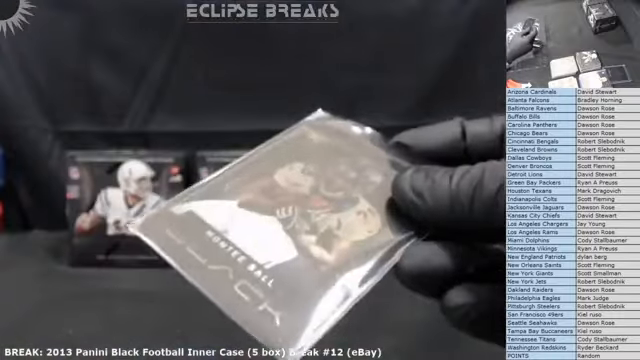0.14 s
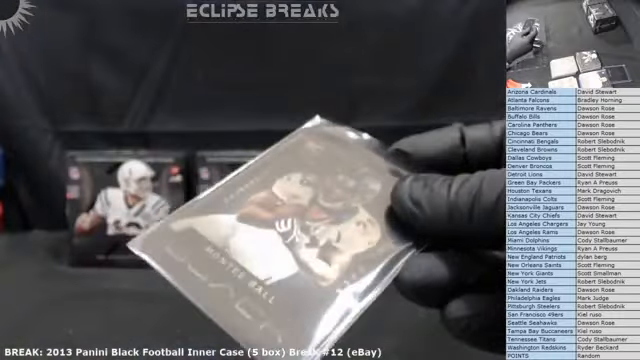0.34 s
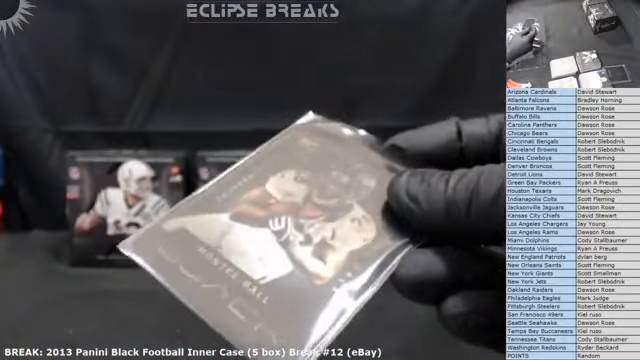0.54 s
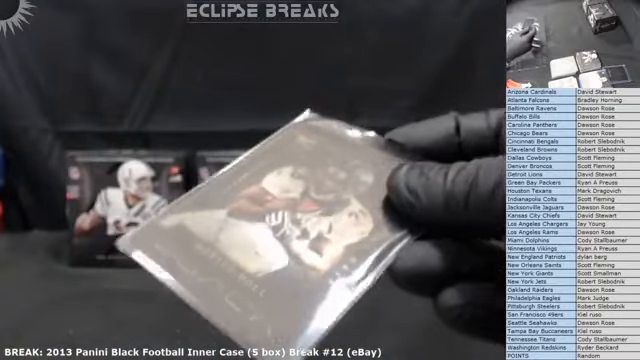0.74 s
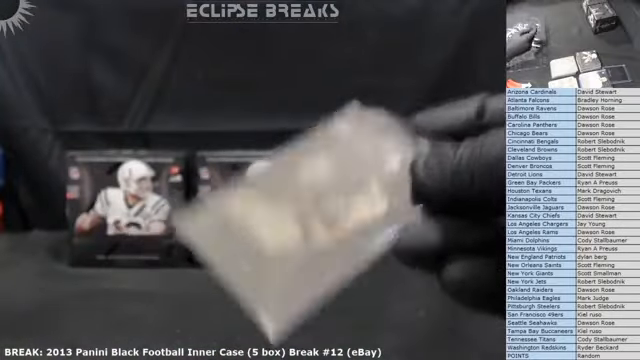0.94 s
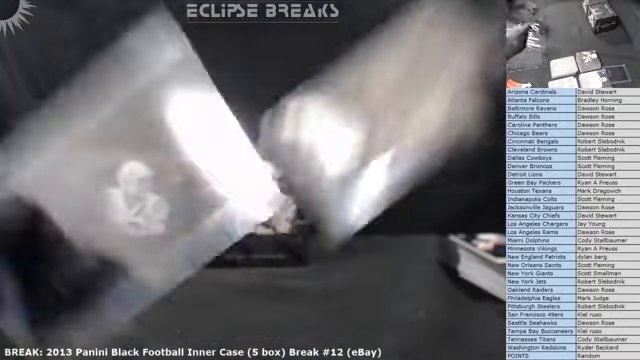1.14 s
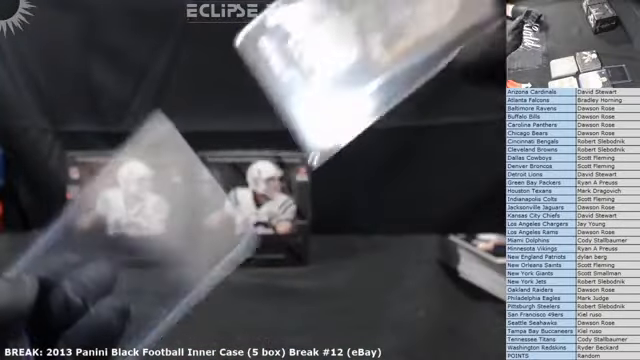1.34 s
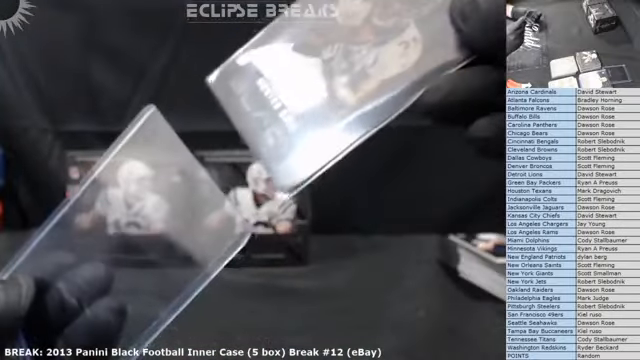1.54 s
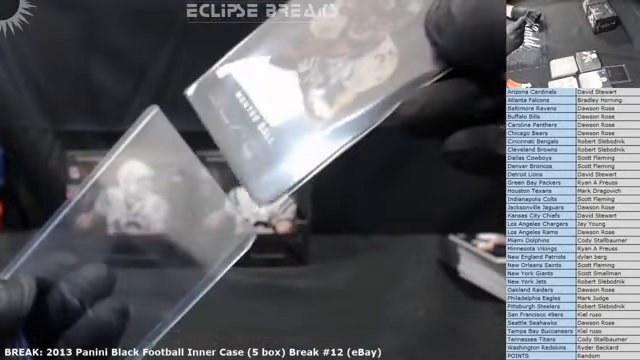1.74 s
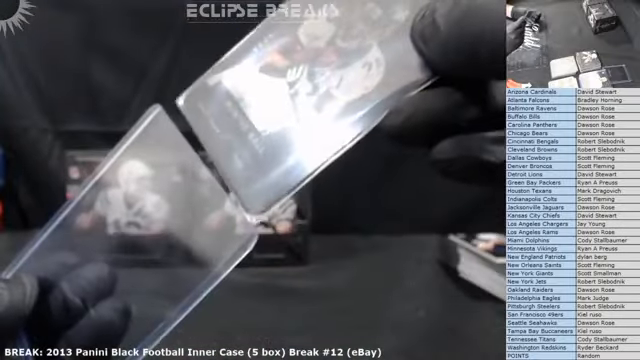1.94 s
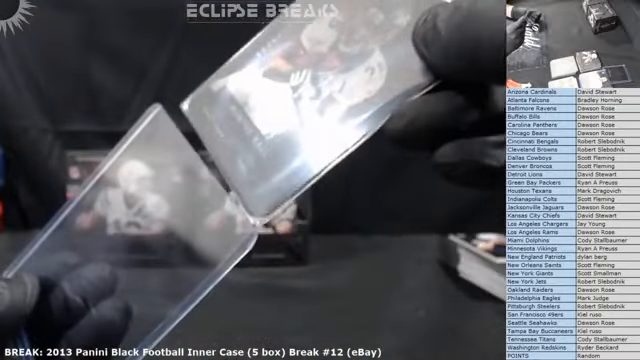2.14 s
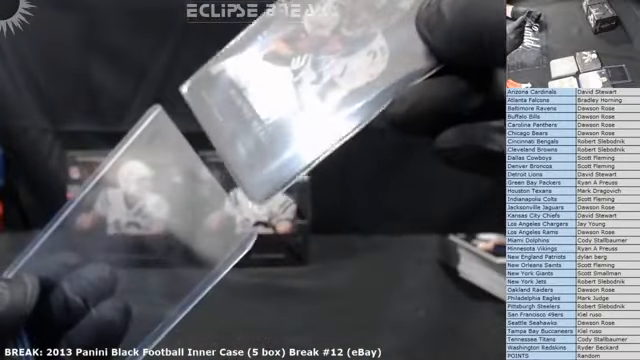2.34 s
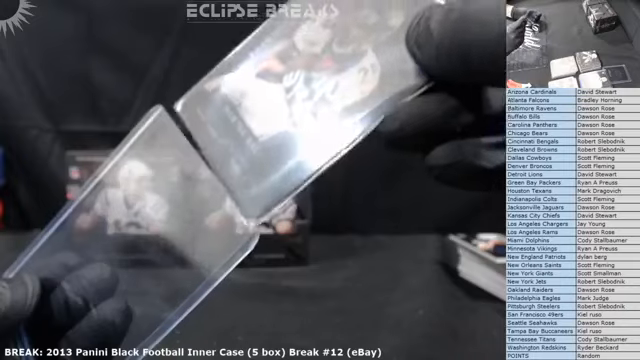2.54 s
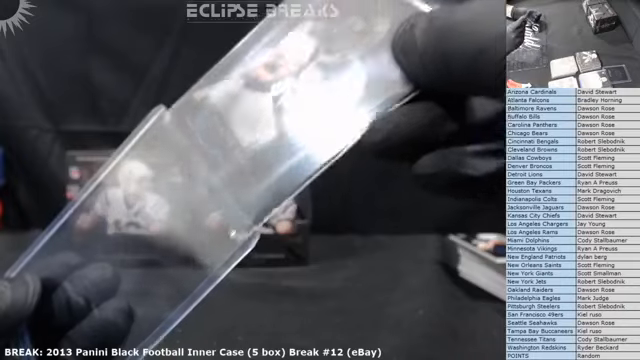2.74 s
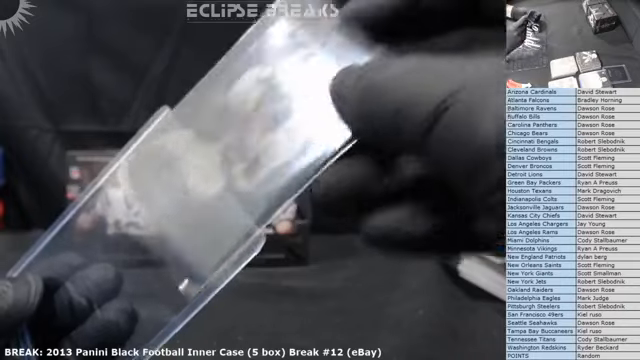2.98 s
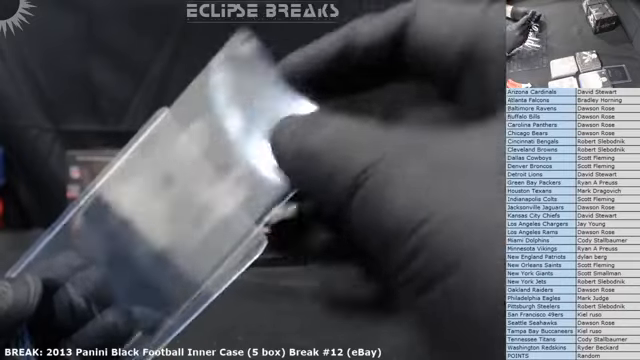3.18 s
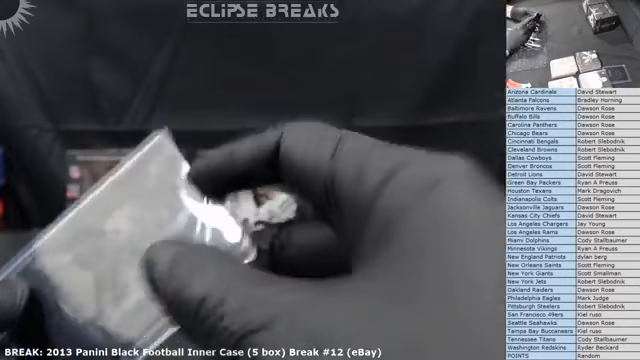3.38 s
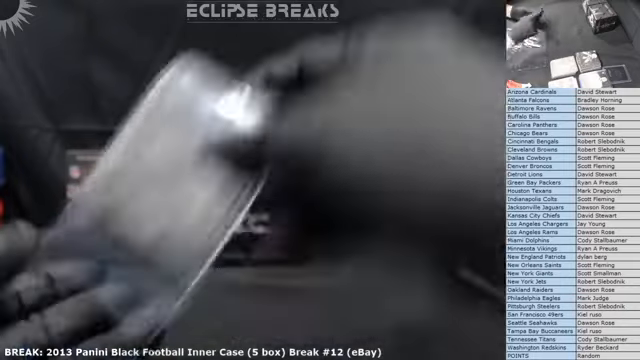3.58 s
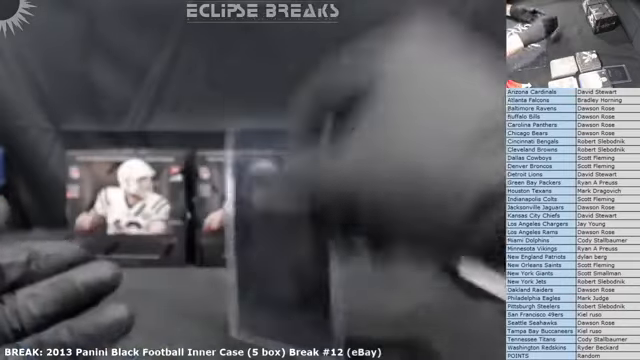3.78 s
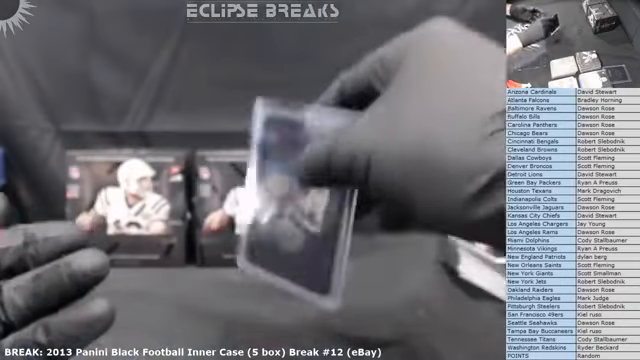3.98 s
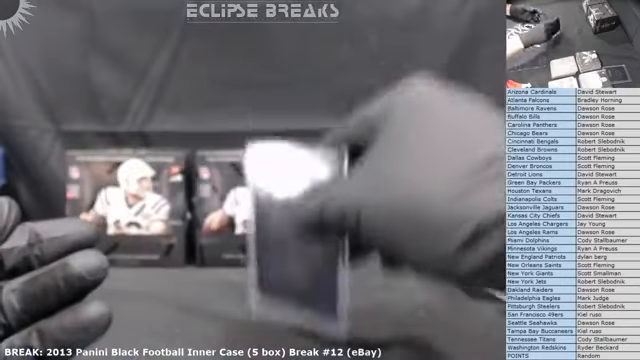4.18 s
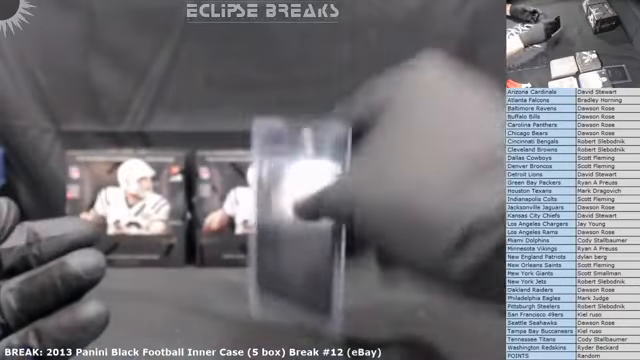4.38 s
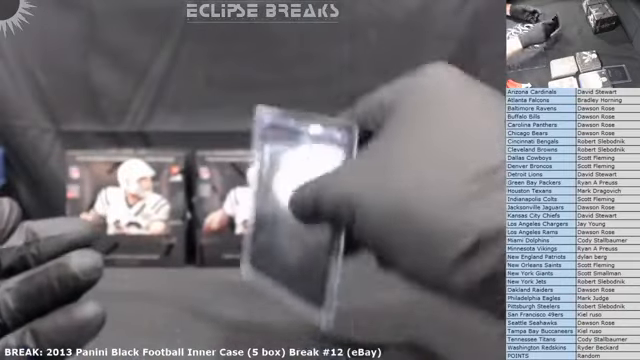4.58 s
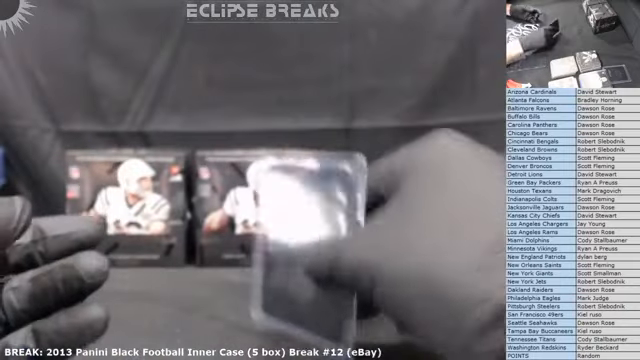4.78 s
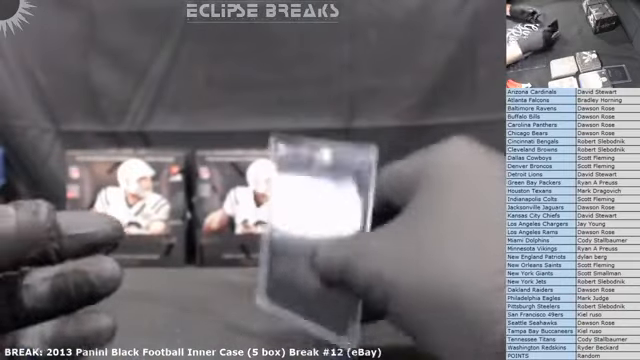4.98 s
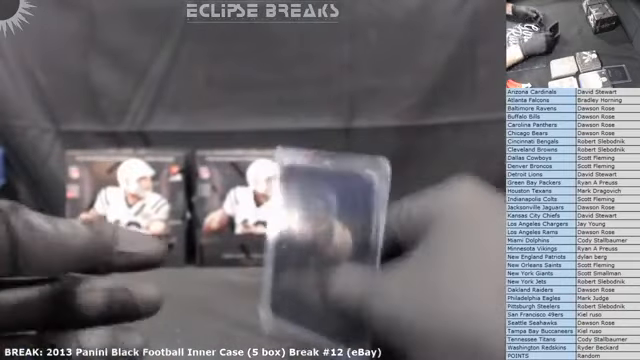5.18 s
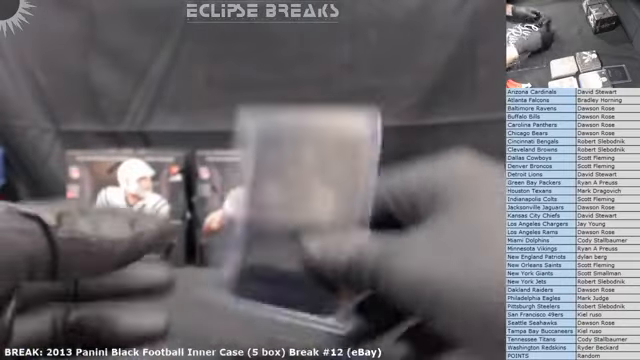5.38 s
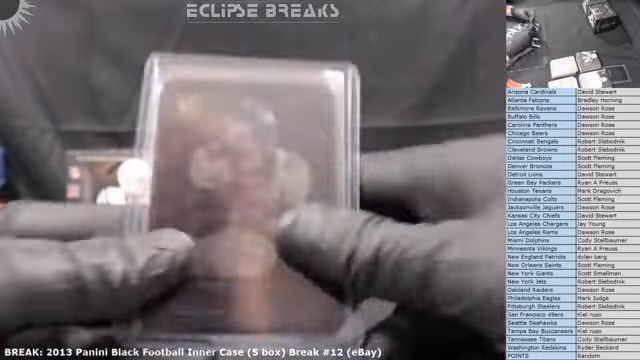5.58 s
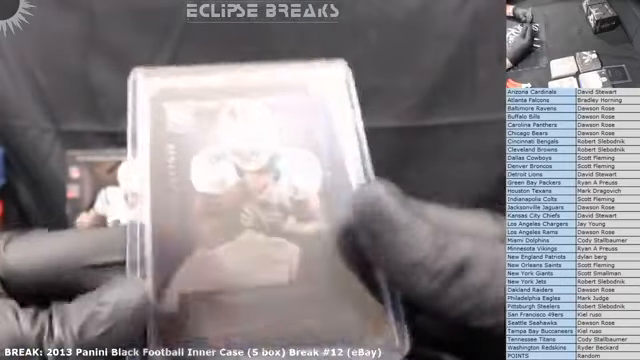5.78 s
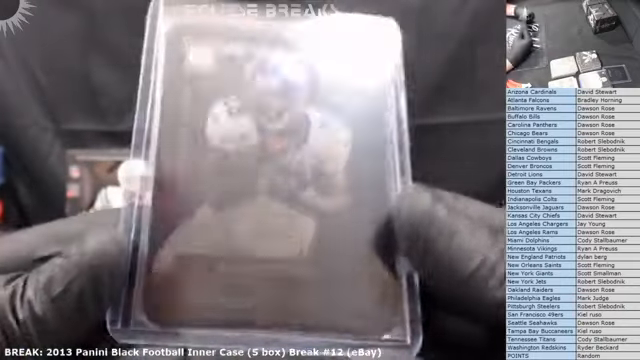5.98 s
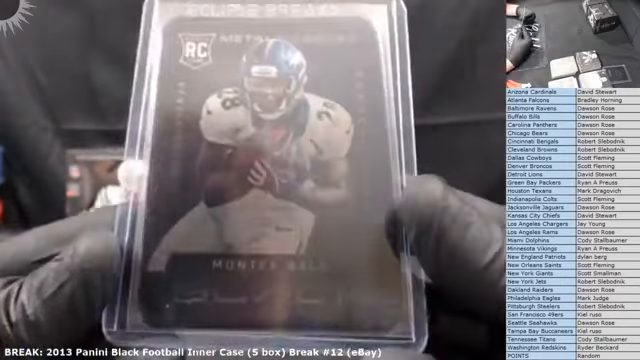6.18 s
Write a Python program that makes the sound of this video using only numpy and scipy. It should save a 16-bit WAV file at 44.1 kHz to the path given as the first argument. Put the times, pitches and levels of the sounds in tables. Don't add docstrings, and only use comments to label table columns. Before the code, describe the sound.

Close on a table in a quiet room, gloved fingers rub thin plastic with faint crinkles and small ticks while a cuff drags and knocks. After a near-silent gap, a card slides into a hollow plastic holder and snaps home. Seven heavy edge taps follow, booming through the tabletop with hard cracks, overloading the small stereo microphone. Light rubbing and clicks finish.

```python
import sys
import numpy as np
from scipy import signal
from scipy.fft import rfft, irfft, next_fast_len
from scipy.io import wavfile
from scipy.ndimage import uniform_filter1d, map_coordinates

SR = 44100
rng = np.random.default_rng(int(sys.argv[2]) if len(sys.argv) > 2 else 0)


def magnitude_from_level(level_db):
    exponent = np.asarray(level_db, float) / 20
    return 10 ** exponent


def transcribe(u):
    v = np.clip(np.atleast_2d(u).T, -1, 1)
    q = np.round(v * 32767).astype(np.int16)
    wavfile.write(sys.argv[1], SR, q)


N = 274302

# pitch_hz, level_db
WHINE = [(1001, -84), (1200, -93), (1400, -101), (1599, -92), (1798, -97.5), (3601, -106), (5599, -110),
         (5798, -110), (6998, -103), (7499, -104), (8000, -98.5), (13749, -115), (14250, -114),
         (14750, -111)]
# freq_hz, density_db_per_hz
CONVERTER_HISS = [(7000, -38.5), (8800, -14), (10000, -4.5), (14000, -4), (15000, -5), (15300, -58)]
# freq_hz, density_db_per_hz
AIR = [(11, -36), (18, -1), (49, 0.5), (71, -8.5), (118, -5.5), (269, -18.5), (367, -25), (417, -24),
       (858, -34), (1030, -34), (1470, -36), (1590, -39.5), (1960, -41.5), (7870, -50.5), (8500, -29),
       (11000, -88.5), (18700, -120)]
AIR_DB, RUMBLE_DB = -58, -67
# centre_s, width_s, rise_db
LEANS = [
    (.62, .2, 6.6),
    (3.6, 0.68, 4.2),
    (4.4, .3, 3.3),
    (4.869, 0.2, 16),
    (5.399, 0.17, 6.8),
]
# freq_hz, likeness_0_to_1
ALIKE = [(60, 0.92), (120, 0.96), (240, 0.73), (490, 0.76), (1000, 0.44), (2010, 0.053), (4060, 0.053),
         (8200, 0.42)]
# freq_hz, t60_s
ROOM = [(100, .3), (400, 0.42), (1000, 0.26), (2000, 0.23), (3300, 0.23), (3700, 0.14), (6000, 0.17)]

# freq_hz, density_db_per_hz
CUFF = [(71, -42.5), (120, -16), (242, -10.5), (356, -4), (607, -15.5), (833, -10.5), (944, -15),
        (1800, -37.5), (2340, -43), (3960, -120)]
# time_s, level_db
DRAG = [
    (0.36, -75),
    (0.456, -52.5),
    (0.582, -60),
    (0.638, -60.5),
    (0.76, -60.5),
    (0.85, -80),
]
# start_s, peak_db, pitch_hz, t60_s
KNOCKS = [(0.463, -38, 265, 0.037), (0.508, -37, 328, 0.071), (0.529, -47, 360, 0.044),
          (0.583, -45, 353, 0.078), (0.656, -50, 337, 0.2), (0.69, -26, 420, 0.03),
          (0.703, -27.5, 321, 0.044), (0.716, -40.5, 289, 0.15), (0.749, -47, 302, 0.087),
          (0.958, -60, 225, 0.053), (1.108, -58.5, 323, 0.066), (5.759, -45.5, 400, 0.025),
          (3.523, -47.5, 291, 0.023), (5.511, -50.5, 190, 0.03), (5.525, -49.5, 574, 0.036),
          (5.572, -54, 563, .04), (5.793, -51.5, 585, .03)]
# start_s, level_db, t60_s
THUMPS = [
    (0.524, -48, 0.071),
    (0.748, -62, 0.089),
    (1.306, -40.5, 0.061),
    (1.464, -50, 0.041),
    (3.28, -40.5, 0.072),
    (5.511, -46, 0.052),
]
THUMP_HZ = 59.7

# start_s, peak_db, pitch_hz, left_over_right_db
TICKS = [(0.41, -57, 2170, 8), (0.508, -52, 1100, 0), (0.587, -57, 1000, -2), (0.6917, -51, 1300, 12),
         (0.715, -45, 1330, -2), (0.8687, -46, 1540, 3), (0.8775, -51, 1590, -2), (0.917, -60, 5200, 5),
         (1.0498, -58, 1650, 15), (1.0985, -54, 1310, 9), (1.3674, -88, 1600, 1.5),
         (2.4963, -53.5, 1360, 4), (2.6864, -56.5, 1810, 4), (3.023, -56, 1670, 17), (3.257, -41, 7500, 2),
         (3.2721, -17, 1110, 2.5), (3.455, -46, 2950, 3.5), (3.479, -54, 1600, -5), (3.514, -49, 7030, 1),
         (4.939, -40.5, 1740, -3.5), (5.5123, -40, 1697, -5), (5.523, -44.5, 4570, 10),
         (5.5555, -34, 1540, 0), (5.5692, -39, 1560, 2), (5.6086, -52, 1600, -6), (5.792, -50.5, 1680, 1),
         (5.8348, -57, 3630, 17), (5.87, -55, 3260, -7), (5.946, -49, 4730, -4), (6.05, -67, 1342, 0)]
TICK_T60_S = 0.0096
# start_s, level_db, pitch_hz, t60_s
SEAT = [
    (3.271, -33, 953, 0.027),
    (3.2730, -36, 650, 0.018),
]

# peak_s, rise_s, fall_s, fine_hiss_db, pressure_db (0 skims the film, more squeezes the holder)
STROKES = [(.012, 0.056, 0.12, -77, -3), (.142, 0.027, 0.11, -78, -5), (.324, 0.016, 0.043, -75.5, -4),
           (.438, 0.11, 0.53, -77, 4), (.714, 0.046, 0.06, -73, 9.5), (.792, 0.046, .1, -70, -5),
           (.92, 0.019, 0.16, -75.5, -12), (.97, 0.085, 0.11, -80, 4.5), (1.056, 0.021, 0.058, -74.5, -3.5),
           (1.15, 0.14, 0.04, -90.5, 7), (1.32, 0.35, 0.15, -84, 3), (1.37, 0.018, .05, -92, 9.5),
           (3.365, 0.097, 0.037, -73.5, 1.5), (2.69, 0.034, 0.039, -82, 2), (3.295, 0.014, 0.21, -73, 3),
           (3.46, 0.036, 0.024, -69, 4), (3.518, 0.1, 0.043, -72, 2.5), (3.602, 0.16, 0.3, -75, -1.5),
           (5.36, 0.12, 0.13, -90.5, 11), (5.5, 0.13, 0.11, -72.5, 2), (5.555, 0.013, 0.074, -84, 10.5),
           (5.725, 0.19, 0.061, -67.5, -1.5), (5.83, 0.19, 1, -71, -0.5), (6.113, 0.1, 0.16, -79, -6)]
FADE_DB = 21.5
SQUEEZE = 1.54
# freq_hz, density_db_per_hz
FINE = [(3000, -22.5), (4500, -10.5), (5500, -4.5), (7200, -5.5), (8500, -1), (9500, -42.5)]
# freq_hz, density_db_per_hz
COARSE = [(1400, -8.5), (2200, -6.5), (3300, -0.5), (4500, -4), (6500, -16)]
# freq_hz, density_db_per_hz
GLOVE = [(350, -28), (600, 7.5), (1200, -0.5), (2200, -1), (3500, -22.5)]
# time_s, friction_db
SLIDE = [
    (2.66, -89),
    (2.868, -72.5),
    (2.934, -71.5),
    (3.142, -70.5),
    (3.262, -59),
    (3.276, -66),
    (3.29, -100),
]
SLIDE_COARSE_DB, SLIDE_GRIP_DB = -5.5, -3
BITE_S, BITE_DB_PER_S = 3.17, 47
# time_s, pitch_hz, level_db
SQUEAK = [
    (2.872, 6560, -93),
    (2.88, 6800, -70),
    (2.9, 7200, -72),
    (2.914, 7500, -78),
]

# start_s, boom_hz, boom_db, boom_t60_s
BOOMS = [
    (3.806, 85, -18, 0.094),
    (3.8213, 98, -8.5, 0.064),
    (4.098, 110, -9, 0.13),
    (4.3955, 113, -8, 0.14),
    (4.6574, 112, -7, 0.13),
    (4.828, 107, -2, 0.072),
    (5.062, 85.6, -4, 0.061),
    (5.2193, 105, -9, 0.055),
]
BOOM_LAG = .17
# freq_hz, density_db_per_hz
SWAY = [(20, -24), (40, 4.5), (70, 5.5), (110, -5), (200, -47.5)]
SWAY_DB, BELL_DB = -30.5, -53.5
# start_s, panel_db, modes_260_to_350_hz_db, crack_db, crack_t60_s
TAPS = [
    (3.8052, -19.5, -7.5, -19.5, 0.03),
    (3.8216, -30.5, -21.5, -30, 0.016),
    (4.0990, -15.5, -15, -20, 0.046),
    (4.3952, -20, -15.5, -10.5, 0.022),
    (4.6583, -15, -15.5, -21.5, 0.05),
    (4.8270, -17.5, -15.5, -27, 0.073),
    (5.0600, -21.5, -29, -28, 0.041),
    (5.2185, -23, -22.5, -30.5, 0.024),
]
# pitch_hz, level_db, t60_s
PANEL = [(130.4, 1.5, 0.24), (186.4, -13.5, 0.31), (230.9, 1, 0.12), (289, -2.5, 0.12), (327.4, -6.5, 0.23),
         (378, -7.5, 0.26), (417.5, -1.5, 0.17), (490, -2, 0.14), (515.2, -7.5, 0.2), (571.3, 1, 0.11),
         (601.6, -4, 0.23), (676, -14.5, 0.25), (716.3, -4.5, 0.097), (751.4, -13.5, 0.22),
         (849, -33.5, 0.53), (870, -16.5, 0.18), (953, -17, 0.16), (998, -14, 0.12), (1186, -19.5, 0.22),
         (1330, -37, 0.33), (1500, -35.5, 0.061)]
LOW_PANEL_DB = -0.33
PRESS_GAIN, PRESS_S = 1.34, 0.013
# freq_hz, level_db
EDGE = [(300, -4.5), (800, 18), (2000, 8.5), (3200, -4), (3700, -6.5), (6000, -12), (9000, -11.5)]
# centre_hz, width_hz, level_db
HOLDER = (3080, 930, -11.5)
# start_s, level_db
LEAD_INS = [
    (3.798, -54.5),
    (4.65, -65.5),
    (4.82, -62),
    (5.056, -60),
    (5.21, -58),
]


def unit(x):
    return x / np.sqrt(np.mean(x ** 2) + 1e-20)


def along(points, hz):
    f, v = np.transpose(points)
    return np.interp(np.log(hz + 1), np.log(f + 1), v)


def curves(rows, rest=None):
    s, *cols = np.transpose(rows)
    return [np.interp(np.arange(N) / SR, s, c, rest, rest) for c in cols]


def wobble(rate):
    knots = rng.standard_normal(int(N * rate / SR) + 4)
    return map_coordinates(knots, [np.arange(N) * rate / SR])


def filtered(x, response):
    n = x.shape[-1]
    m = next_fast_len(n + 8192)
    return irfft(rfft(x, m) * response(np.fft.rfftfreq(m, 1 / SR)), m)[..., :n]


def rush(spectrum, grain_db=0., grain_rate=300):
    pair = rng.standard_normal((2, N)) * magnitude_from_level(grain_db * wobble(grain_rate))

    def mid_side(hz):
        turn = np.arccos(np.clip(along(ALIKE, hz), -1, 1)) / 2
        return magnitude_from_level(along(spectrum, hz)) * [np.cos(turn), np.sin(turn)]

    mid, side = filtered(pair, mid_side)
    return unit(np.array([mid + side, mid - side]))


def add(out, s, sound):
    spot = out[:, round(s * SR):][:, :sound.shape[-1]]
    spot += sound[..., :spot.shape[1]]


def ring(t, hz, t60, attack, lag=0., rough=0., glide=0.):
    steps = np.cumsum(rng.standard_normal(40))
    drift = rough * map_coordinates(steps - steps[0], [t * 60])
    bent = t + glide * np.log1p(t / 0.022) * t
    phase = 2 * np.pi * hz * bent + drift + np.array([[lag], [-lag]])
    return -np.sin(phase) * magnitude_from_level(-60 * t / t60) * (1 - np.exp(-t / attack))


def room(x):
    hz, t, z = signal.stft(rng.standard_normal((2, SR // 2)), SR, nperseg=256)
    tail = signal.istft(z * magnitude_from_level(-60 * t / along(ROOM, hz)[:, None]), SR, nperseg=256)[1]
    return signal.fftconvolve(np.pad(x, ((0, 0), (200, 0))), tail / np.linalg.norm(tail[0]), axes=1)


def patchy(x, patch_db):
    z = signal.stft(x, nperseg=256)[2]
    field = uniform_filter1d(rng.standard_normal(z.shape[1:]), size=4, axis=0)
    field = uniform_filter1d(field, size=16, axis=1)
    return signal.istft(z * magnitude_from_level(patch_db * unit(field)), nperseg=256)[1][:, :N]


def whine():
    t, lines = np.arange(N) / SR, np.zeros((2, N))
    for hz, db in WHINE:
        phase = 2 * np.pi * (hz * t + rng.random()) + np.array([[.4], [-.4]])
        lines += magnitude_from_level(db + 6 + .9 * wobble(12)) * np.sin(phase)
    return lines + magnitude_from_level(-94.5) * rush(CONVERTER_HISS)


def air():
    t = np.arange(N) / SR
    swell_db = RUMBLE_DB + sum(db * np.exp(-((t - s) / width) ** 2) for s, width, db in LEANS)
    tone = magnitude_from_level(AIR_DB) * rush(AIR)
    bass = filtered(tone, lambda hz: 1 / (1 + (hz / 300) ** 4))
    return tone + bass * (magnitude_from_level(swell_db - AIR_DB + 5.0) - 1)


def cuff():
    out, t = np.zeros((2, N)), np.arange(SR // 4) / SR
    cloth = rush(CUFF)
    for s, db, hz, t60 in KNOCKS:
        puff = .5 * magnitude_from_level(-60 * t / t60) * (1 - np.exp(-t / 0.0006)) * cloth[:, round(s * SR):][:, :len(t)]
        panel = ring(t, hz, t60, 0.0019, .1, rough=0.07)
        under = .5 * ring(t, 0.65 * hz, 0.3 * t60, 0.0014, 0.36)
        add(out, s, magnitude_from_level(db) * (panel + under + puff))
    for s, db, t60 in THUMPS:
        add(out, s, -magnitude_from_level(db + 14) * ring(t, THUMP_HZ, t60, 0.0063))
    drag = magnitude_from_level(curves(DRAG, rest=-120)[0] - 2.0)
    return out + drag * rush(CUFF, grain_db=2, grain_rate=42)


def ticks():
    out, t = np.zeros((2, N)), np.arange(SR // 10) / SR
    for s, db, hz, pan_db in TICKS:
        click = magnitude_from_level(-60 * t / TICK_T60_S) * rng.standard_normal((2, len(t)))
        click += 0.33 * click.sum(axis=0)

        def colour(f):
            bright = 0.29 * 1j * f / (900 + 1j * f)
            width = 1j * f * .5 * hz
            return bright + width / (hz * hz - f * f + width)

        snap = magnitude_from_level(db + np.array([[pan_db], [-pan_db]]) / 2) * filtered(click, colour)
        add(out, s, snap)
        add(out, s, magnitude_from_level(-20.0) * room(snap))
    for s, db, hz, t60 in SEAT:
        add(out, s, magnitude_from_level(db) * ring(t, hz, t60, 0.0001, lag=0.36))
    return out


def gloves():
    t, layers = np.arange(N) / SR, np.zeros((3, N))
    for s, rise, fall, db, press_db in STROKES:
        reach_db = np.interp(t, [s - 3 * rise, s, s + 3 * fall], [-3 * FADE_DB, 0, -3 * FADE_DB])
        layers += magnitude_from_level(db + reach_db + np.array([[0], [press_db], [SQUEEZE * press_db]]))
    slide = magnitude_from_level(curves(SLIDE, rest=-140)[0])
    bite_db = BITE_DB_PER_S * np.minimum(t - BITE_S, 0)
    fine = layers[0] + slide
    coarse = layers[1] + magnitude_from_level(SLIDE_COARSE_DB) * slide
    grip = layers[2] + magnitude_from_level(SLIDE_GRIP_DB + bite_db) * slide
    rub = fine * rush(FINE, grain_db=1.5)
    rub += coarse * rush(COARSE, grain_db=1.5)
    rub += grip * rush(GLOVE, grain_db=1.5)
    squeak_db = curves(SQUEAK, rest=-120)[1] + 6.0
    squeak = magnitude_from_level(squeak_db) * np.sin(2 * np.pi * np.cumsum(curves(SQUEAK)[0]) / SR)
    return magnitude_from_level(0.73 * wobble(55)) * patchy(rub, patch_db=2.5) + squeak


def table_booms():
    out, t = np.zeros((2, N)), np.arange(SR // 2) / SR
    legs = rush(SWAY)
    for s, hz, db, t60 in BOOMS:
        boom = magnitude_from_level(db) * ring(t, hz, t60, attack=0.0051, lag=BOOM_LAG, rough=0.36, glide=0.043)
        swing = magnitude_from_level(SWAY_DB - 3 - 60 * t / 0.36) * (1 - np.exp(-t / 0.0026))
        sway = swing * legs[:, round(s * SR):][:, :len(t)]
        bell = magnitude_from_level(BELL_DB) * ring(t, 282, 1.0, attack=.01, rough=0.18)
        add(out, s, boom + sway + bell)
    return out


def panel_rings():
    out, t = np.zeros((2, N)), np.arange(SR // 2) / SR
    press = 1 + PRESS_GAIN * np.exp(-t / PRESS_S)
    for s, edge_db, middle_db, _, _ in TAPS:
        panel_db = [edge_db + LOW_PANEL_DB, middle_db, edge_db]
        for hz, db, t60 in PANEL + PANEL:
            scatter_db = rng.normal(0, 1.84, (2, 1)) + rng.normal(0, 1.59)
            level = magnitude_from_level(db - 10.0 + panel_db[(hz > 260) + (hz > 350)] + scatter_db)
            lag = hz / 3500 * rng.normal()
            add(out, s, level * press * ring(t, hz * rng.normal(1, 0.0162), t60, 0.0011, lag, rough=hz / 420))
    return out


def edge_cracks():
    out, t = np.zeros((2, N)), np.arange(SR // 2) / SR
    centre, width, hollow_db = HOLDER

    def hollow(f):
        return magnitude_from_level(hollow_db) * 1j * f * width / (centre ** 2 - f * f + 1j * f * width)

    def edge(hz):
        return magnitude_from_level(along(EDGE, hz))

    for s, _, _, crack_db, crack_t60 in TAPS:
        burst = magnitude_from_level(-60 * t / crack_t60) * rng.standard_normal((2, len(t)))
        burst += 0.74 * burst.sum(axis=0)
        late = lambda hz: edge(hz) * np.exp(-2j * np.pi * hz * 0.001034)
        crack = magnitude_from_level(crack_db - 7.5) * filtered(burst, late)
        echo = room(crack[:, :SR // 10])
        add(out, s, crack)
        add(out, s, magnitude_from_level(-14.5) * echo + filtered(echo, hollow))
    for s, db in LEAD_INS:
        add(out, s, magnitude_from_level(db) * unit(filtered(rng.standard_normal((2, SR // 150)), edge)))
    return out


def scene():
    taps = table_booms() + panel_rings() + edge_cracks()
    return (air() + cuff() + ticks() + gloves() + taps) * magnitude_from_level([[.4], [-.4]])


def low_pass(x):
    return signal.sosfilt(signal.butter(12, 15000, fs=SR, output="sos"), x)


def record(dry):
    clipped = dry / (1 + np.abs(dry / 0.15) ** 8) ** (1 / 8)
    band = signal.sosfilt(signal.cheby2(10, 55, 9000, fs=SR, output="sos"), clipped)
    tilted = filtered(band, lambda hz: 1j * hz / (38 + 1j * hz))
    limited = tilted / (1 + np.abs(tilted / 0.24) ** 8) ** (1 / 8)
    return low_pass(limited + whine())


dry = scene()
out = record(dry)
transcribe(out)
```